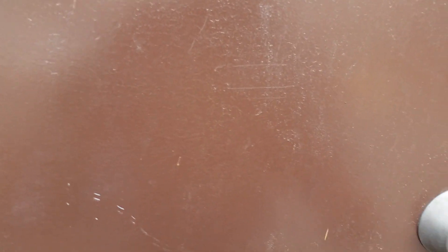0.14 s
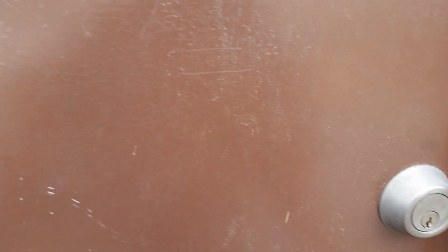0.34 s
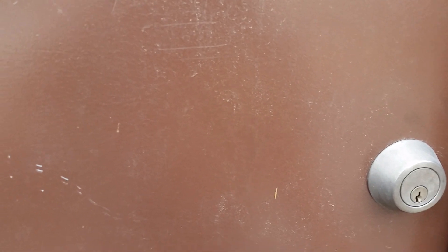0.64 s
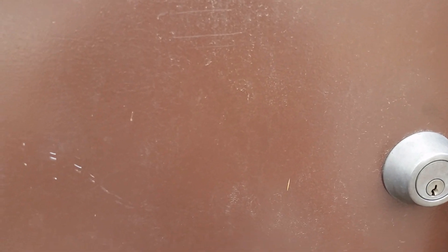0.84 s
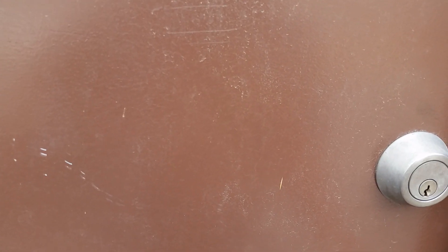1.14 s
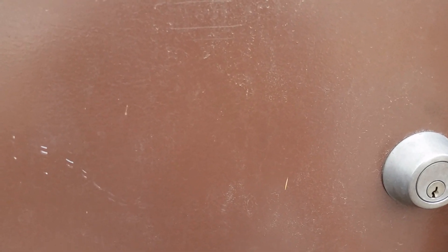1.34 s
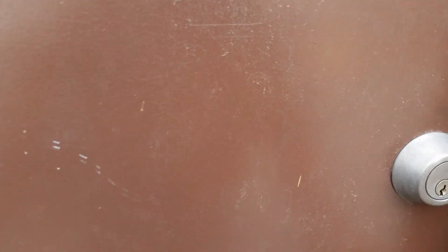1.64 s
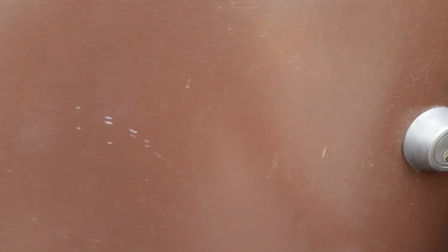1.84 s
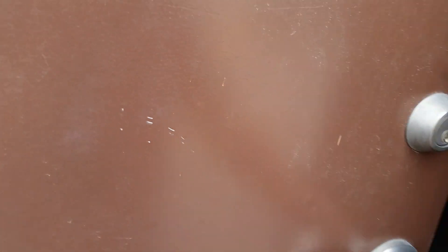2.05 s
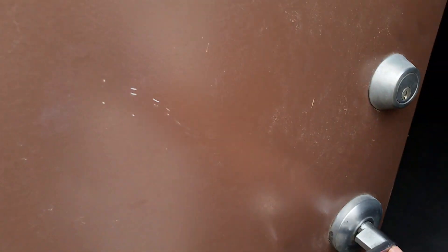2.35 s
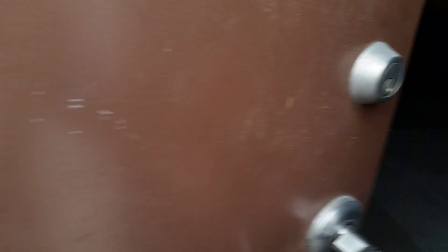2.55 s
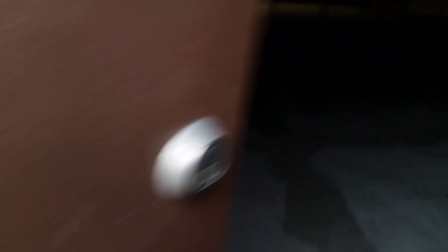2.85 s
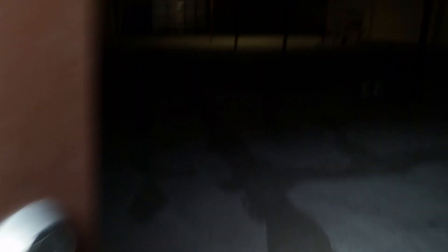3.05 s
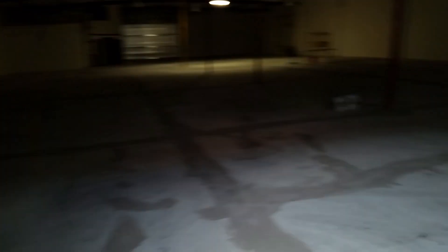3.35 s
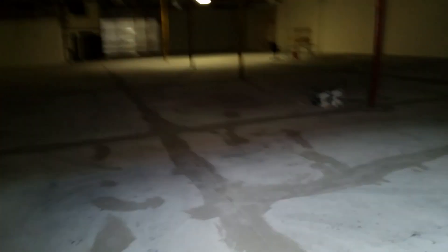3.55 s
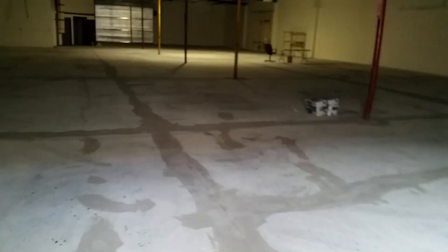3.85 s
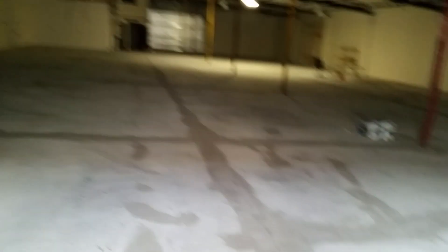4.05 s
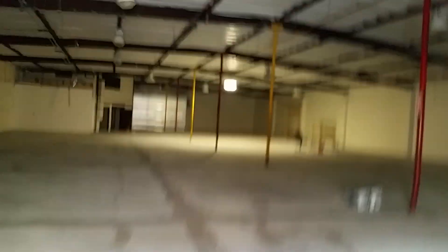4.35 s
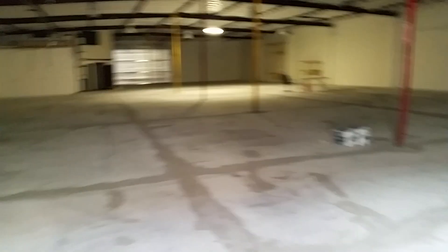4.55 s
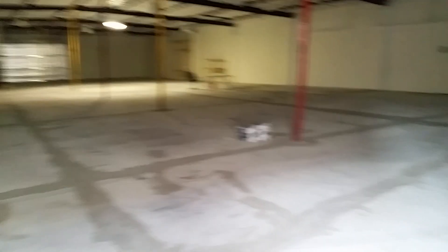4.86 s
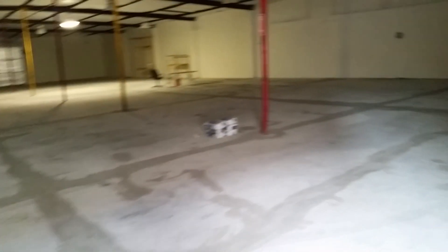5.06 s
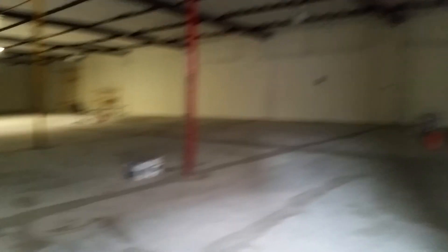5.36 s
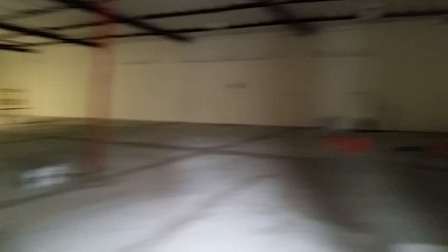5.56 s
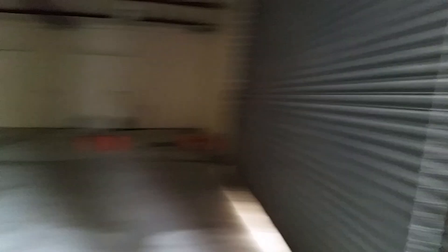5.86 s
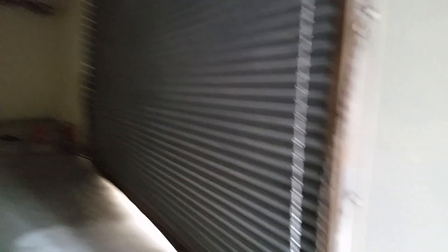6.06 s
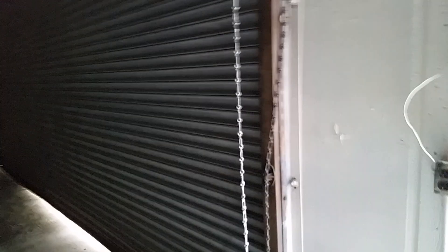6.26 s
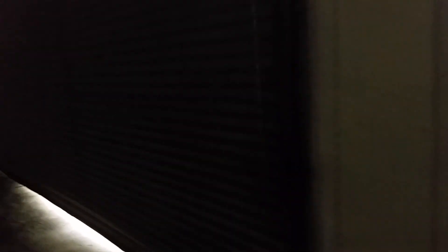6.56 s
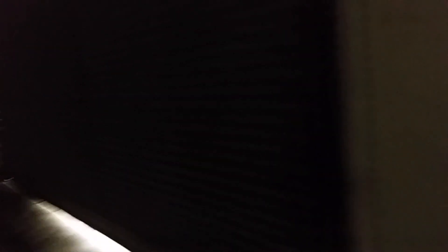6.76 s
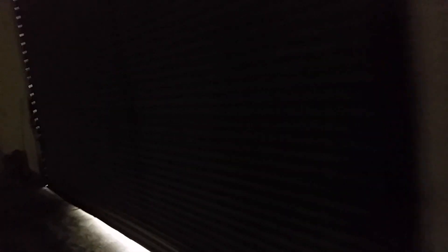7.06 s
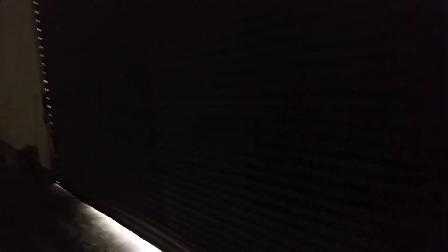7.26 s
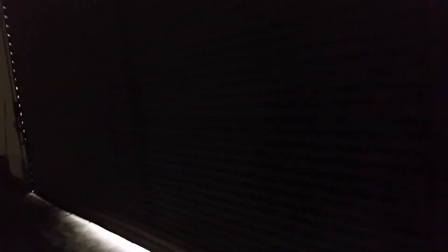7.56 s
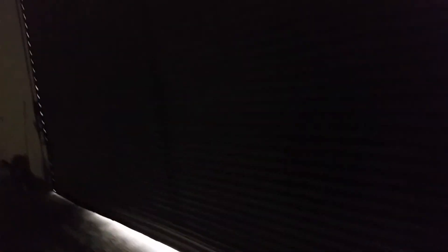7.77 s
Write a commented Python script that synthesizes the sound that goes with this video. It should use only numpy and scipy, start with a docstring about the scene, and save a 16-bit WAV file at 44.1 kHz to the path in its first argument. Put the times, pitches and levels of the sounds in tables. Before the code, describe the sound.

Loose keys clink over a heavy low hum, fumbling thumps and squeaks follow inside an empty hall, and a metal door latches shut, muffling the hum.

```python
"""An alley beside a steel door, then the empty hall behind it: a machine drones as wavering shaft orders over noise.
Keys jangle as noise clinks with ringing modes; the hand slips on the microphone case as air pulses and rasps.
Bright swishes, keys scraping and cloth, are noise strokes; thin metal rings and squeaks are wavering tones.
The door shuts: latch clacks and frame knocks are bursts, the leaf booms in low modes, a noise tail is the hall."""
import sys
import numpy as np
from scipy import signal
from scipy.fft import rfft, irfft, next_fast_len
from scipy.io import wavfile
from scipy.ndimage import map_coordinates

SR = 44100
rng = np.random.default_rng(int(sys.argv[2]) if len(sys.argv) > 2 else 0)


def inscribe(sig):
    """Save sig as 16-bit PCM at rate SR to the path in sys.argv[1].

    A 1-D sig is mono; a 2-D sig holds one channel per row.
    Samples are clipped to [-1, 1] before scaling.
    """
    pcm = np.round(np.clip(np.atleast_2d(sig).T, -1, 1) * 32767)
    wavfile.write(sys.argv[1], SR, pcm.astype(np.int16))


N = 349713

# door contacts as it shuts and settles, levels relative: (time [s], clack [dB], knock [dB], boom [dB],
# hall [dB], leaf free to ring [s])
DOOR_CONTACTS = [(6.673, -8.5, -20.5, -34, -33, .03), (6.686, -13, -18, -30, -42, .025),
                 (6.692, -18, -22, -40, -46, .02), (6.705, -24, -30, -38, -46.5, 0.01),
                 (6.7349, -39, -25, -26.5, -38, 0.54), (6.738, -12, -15, -25.5, -28, .5),
                 (6.7425, -18, -15, -36, -40, .05), (6.756, -24, -19, -18, -35, 0.33),
                 (6.765, -27, -22, -40, -44, .05), (6.777, -30, -25, -40, -46, .05),
                 (6.99, -48, -32, -44, -41.5, .05)]
# lower part of a key contact: (frequency [Hz], density [dB/Hz])
DULL_SPECTRUM = [(2000, -32), (3500, -7.5), (5500, -2), (7000, -6), (9000, -19.5)]


def amp(db):
    """Gain of a level in dB."""
    return 10 ** (np.asarray(db) / 20)


def unit(x):
    """Scaled to rms 1."""
    return x / np.sqrt(np.mean(x ** 2) + 1e-20)


def along(points, hz):
    """(Hz, value) points interpolated on a log frequency axis."""
    f, v = np.transpose(points)
    return np.interp(np.log(hz + 1), np.log(f + 1), v)


def curves(rows):
    """One value per sample for each column after the time."""
    s, *cols = np.transpose(rows)
    return [np.interp(np.arange(N) / SR, s, c) for c in cols]


def wobble(rate_hz):
    """Smooth random curve, rate_hz knots a second."""
    at = np.arange(0, N + 32, 32)
    knots = rng.standard_normal(int(N * rate_hz / SR) + 4)
    smooth = map_coordinates(knots, [at * rate_hz / SR], mode="nearest")
    return np.interp(np.arange(N), at, smooth)


def filtered(x, response):
    """x times a response of frequency."""
    m = next_fast_len(x.shape[-1] + 8192)
    return irfft(rfft(x, m) * response(np.fft.rfftfreq(m, 1 / SR)), m)[..., :x.shape[-1]]


def coloured(x, spectrum):
    """x shaped by (Hz, dB) points, rms 1."""
    return unit(filtered(x, lambda hz: amp(along(spectrum, hz))))


def sides(db):
    """Left and right gains for a left-minus-right level."""
    return np.sqrt(2 / (1 + amp(np.array([-2 * db, 2 * db]))))


def ports(pair, spectrum):
    """Two noises coloured and blended to rms 1; the microphone ports are most alike in the bass."""
    # left-right likeness: (frequency [Hz], likeness [0-1])
    likeness = [(60, .993), (150, .99), (300, .9), (600, 0.78), (1200, .45), (3000, .3), (6000, .05),
                (14000, 0.031)]
    # port balance: (frequency [Hz], left minus right [dB])
    port_lean = [(60, 1.5), (110, 0.5), (200, 0.5), (380, 2), (700, 3.5), (1290, 7), (2380, 4.5),
                 (4400, -2.5), (8120, 13.5), (15000, -12)]
    m = next_fast_len(pair.shape[1])
    hz = np.fft.rfftfreq(m, 1 / SR)
    angle = np.arccos(np.clip(along(likeness, hz), -1, 1)) / 2
    mid, side = rfft(pair, m) * amp(along(spectrum, hz)) * [np.cos(angle), np.sin(angle)]
    blended = np.array([mid + side, mid - side]) * sides(along(port_lean, hz))
    return unit(irfft(blended, m)[:, :pair.shape[1]])


def rush(spectrum, grain_db=0.):
    """Steady stereo noise; grain makes it scratchy."""
    return ports(rng.standard_normal((2, N)) * amp(grain_db * wobble(90)), spectrum)


def strokes(table):
    """Level of rubbing strokes that swell to a peak and fade, linear in dB."""
    out, t = np.zeros(N), np.arange(N) / SR
    for s, db, rise_s, fall_s in table:
        near = slice(max(round((s - 3 * rise_s) * SR), 0), round((s + 3 * fall_s) * SR))
        out[near] += amp(db - 20 * np.maximum((s - t[near]) / rise_s, (t[near] - s) / fall_s))
    return out


def add(track, s, sound):
    """Mix a stereo sound in at s seconds."""
    part = track[:, round(s * SR):][:, :sound.shape[1]]
    part += sound[:, :part.shape[1]]


def machine():
    """Shaft orders waver one by one over rumble, roar, humming panels, whirr, air and hiss."""
    # shaft orders: (multiple of shaft speed, level over the drone [dB])
    shaft_orders = [(2, -17), (3, -15), (4, -3), (5, -4.5), (6, -7.5), (7, -14.5), (8, -2), (10, -21),
                    (12, -24), (13, -22.5)]
    # humming panels: (frequency [Hz], level over the roar [dB])
    panel_modes = [(308, -4.5), (353, -2.5)]
    # levels heard, one list door ajar, one door shut: (time [s], drone [dB], roar [dB], air [rel dB])
    machine_levels = [
        [(0.0, -17, -31.5, -41), (0.16, -20.5, -35, -43), (0.8, -22.5, -38, -45), (1.25, -16.5, -29, -40),
         (1.42, -14, -32, -38), (1.62, -14.5, -27.5, -36), (1.97, -16, -35.5, -40), (2.5, -16, -34.5, -41),
         (2.72, -17.5, -38.5, -44), (2.95, -19, -34, -47.5), (3.29, -19, -31, -47), (3.5, -25.5, -34, -53.5),
         (4.08, -27.5, -39, -55), (4.19, -36, -35, -53), (4.32, -30, -42, -61), (4.45, -33.5, -45.5, -62),
         (4.83, -31.5, -46.5, -67), (5.2, -34.5, -46.5, -68.5), (5.62, -25.5, -35, -56.5),
         (5.92, -23, -33.5, -50), (6.6, -27, -36.5, -55)],
        [(7.2, -43.5, -41.5, -64), (7.482, -39, -41.5, -57), (7.62, -38, -37.5, -58.5),
         (7.78, -32.5, -35, -53.5), (7.93, -30.5, -35, -53.5)],
    ]
    # noise spectra, each: (frequency [Hz], density [dB/Hz])
    rumble_spectrum = [(13, -50), (22, -23), (45, -16), (59, -5), (86, -1), (155, -6.5), (172, -15.5),
                       (199, -15.5), (260, -21), (340, -49), (570, -120)]
    roar_spectrum = [(100, -31), (170, -8), (177, -9.5), (231, -8), (279, -6.5), (356, -3.5), (430, -14.5),
                     (560, -46), (950, -120)]
    whirr_spectrum = [(250, -33.5), (430, -8.5), (455, -3.5), (611, -1), (774, -9), (1030, -13.5),
                      (1170, -17.5), (1300, -16), (1690, -45), (2860, -120)]
    air_spectrum = [(530, -8.5), (900, 3), (1220, -3.5), (1390, 2), (2120, 1), (3120, -6.5), (4370, -9),
                    (5900, -21), (7000, -27.5), (9100, -28.5), (15400, -120)]
    hiss_spectrum = [(3240, -27.5), (5500, -13), (5980, -19), (6260, -12), (6900, -7.5), (8620, -1),
                     (10000, -7.5), (11500, -2.5), (12200, -3), (12900, 0.5), (14300, -2), (14750, -6),
                     (15000, -8)]
    # level following the air: (rel level with air at -50 dB [dB], slope [dB per dB of air])
    whirr_law = (-42.3, .55)
    hiss_law = (-53.5, 1.12)
    # passing the doorway: (start [s], end [s])
    doorway_s = (2.6, 3.2)
    # relative levels in alley, hall, hall with door shut: (order 8 [dB], first panel [dB],
    # second panel [dB], rumble [dB], whirr and hiss [dB])
    places = [(0.1, -7, -2, 3.5, 1.5), (0.6, 4.5, 0.4, -1.5, 0.1), (7, 0.1, -4, 5, -3)]
    # microphone turning from the machine: (time [s], left behind right [ms], extra roar left minus right [dB])
    facing = [(0, .26, 0.1), (2.3, .26, -1), (2.7, -.25, -1), (3.3, -.35, 4), (3.6, -.42, 3),
              (4.6, -.33, 1), (5.0, -.2, -1), (5.3, -.1, -1), (5.6, .3, -1), (6.0, .2, -1),
              (6.25, -.08, -1), (6.6, .3, -1), (7.0, -.3, -1), (7.9, -.12, -1)]
    shaft_hz = 18.35

    ajar, shut = machine_levels
    shut_s = DOOR_CONTACTS[0][0]
    ducked_s = shut_s + .01  # the hum ducks at the first clack
    drone_db, roar_db, air_db = curves(
        [*ajar, (shut_s, *ajar[-1][1:]), (ducked_s, *shut[0][1:]), *shut])
    whirr_db, hiss_db = (db + slope * (air_db + 50) for db, slope in (whirr_law, hiss_law))
    alley, inside, closed = places
    top_db, *panel_db, rumble_db, boost_db = curves(
        [(doorway_s[0], *alley), (doorway_s[1], *inside), (shut_s, *inside), (ducked_s, *closed)])

    def tone(phase, waver):
        level = amp(waver * wobble(5))
        return level * np.sin(phase + 0.13 * waver * wobble(4) + rng.uniform(0, 2 * np.pi))

    turn = 2 * np.pi * np.cumsum(shaft_hz * (1 + 0.0011 * wobble(1.54))) / SR
    orders = sum(amp(db + top_db * (k == 8)) * tone(k * turn, 1.2 if k in (4, 8) else 2.2)
                 for k, db in shaft_orders)
    panels = sum(amp(db + share_db) * tone(2 * np.pi * hz * np.arange(N) / SR, 1.3)
                 for (hz, db), share_db in zip(panel_modes, panel_db))
    rumble = amp(rumble_db - 7.5) * rush(rumble_spectrum)
    drone = amp(drone_db) * (orders * sides(0.53)[:, None] + rumble)
    roar = amp(roar_db + .8 * wobble(4)) * (rush(roar_spectrum) + panels * sides(3.)[:, None])
    roar = roar + amp(whirr_db + boost_db + 2.5) * rush(whirr_spectrum)
    air = amp(air_db + 2.5) * rush(air_spectrum, 1.4)

    lag_ms, lean_db = curves(facing)
    late = np.arange(N) + np.array([[-.5], [.5]]) * lag_ms * SR / 1000
    mixed = drone + roar * sides(lean_db) + air
    low = np.array([map_coordinates(x, [at], mode="nearest") for x, at in zip(mixed, late)])
    return low + amp(hiss_db + boost_db + 2.5) * rush(hiss_spectrum, 1.3)


def keys():
    """Contacts clink; the struck piece rings freely, then damped, out of step at the two ports."""
    # modes of each piece, main one first: (frequency [Hz], level [dB], left minus right [dB],
    # share of the hand's lean, usual free ring [s])
    BIG = [(7850, -1.5, 16, .1, .014), (10930, -4, 8, .3, .011), (11140, -4, 9, .3, .011),
           (11300, -6, 12, .3, .009)]
    SMALL = [(14620, 0.1, -3, 1.4, .006), (9320, 0.1, -5, .4, .015)]
    FOB = [(10210, 0.1, 16, .3, .009), (10700, 0.1, 10, 1.1, .014), (9310, -6, 10, 1.1, .017)]
    TAG = [(5700, 0.1, 4, .1, .016), (4430, 0.1, 6, .1, .02)]
    # key contacts, levels relative: (time [s], clink [dB], piece that rings, ring [dB],
    # other modes over the main one [dB], free ring, where given [s])
    contacts = [(0.0997, -24, SMALL, -51, -10), (0.149, -13, SMALL, -38, -15), (0.3071, -28, BIG, -60, 16),
                (0.33, -16, BIG, -30, 11), (0.7416, -30, BIG, -55, 3), (1.013, -27.5, BIG, -55, 3),
                (1.0459, -18.5, SMALL, -41, -9), (1.076, -27, BIG, -55, 3), (1.2081, -18.5, BIG, -45, 16),
                (1.21, -60, TAG, -44, -15), (1.236, -19, TAG, -40, -15), (1.252, -40, TAG, -44, -15, .008),
                (1.3038, -23, BIG, -25, -15, .008), (1.3318, -27, BIG, -20, -5),
                (1.333, -60, TAG, -41, -15, .008), (1.3946, -25, BIG, -50, 3),
                (1.471, -31, BIG, -22, -12, .016), (1.475, -60, TAG, -37, -4, .01),
                (1.492, -45, BIG, -24, -12, .018), (1.5008, -21, BIG, -34, 11),
                (1.502, -60, TAG, -43, -3, .008), (1.5406, -32, BIG, -48, 19, .03),
                (1.7498, -20.5, FOB, -21, -22), (1.7862, -35, BIG, -26, 4), (1.843, -19, BIG, -29, -12),
                (1.8596, -28, BIG, -35, 18), (1.873, -40, BIG, -15.5, -22, .023),
                (1.8806, -26, BIG, -50, 3), (1.9, -23.5, BIG, -50, 3), (1.955, -15, BIG, -21, 1.5),
                (2.0207, -15, SMALL, -45, -5), (2.0486, -22, BIG, -25, -6, .03), (2.0644, -23, BIG, -27, 7),
                (2.1037, -16, BIG, -45, 23), (2.1174, -31, BIG, -26, -12), (2.2377, -22, BIG, -17, 1.5),
                (2.2628, -37, BIG, -45, 19), (2.53, -22, SMALL, -50, -5), (2.544, -21, SMALL, -50, -5),
                (2.5621, -24.5, SMALL, -50, -5), (2.5786, -9, BIG, -55, 18), (2.6603, -21.5, BIG, -50, 3),
                (2.7336, -21, BIG, -29, -12), (2.7461, -13.5, BIG, -15.5, -22),
                (2.7594, -23.5, BIG, -45, 3), (2.807, -16, BIG, -29, -11, .006),
                (2.823, -50, TAG, -37, -15, .012), (2.8324, -35.5, BIG, -55, 3),
                (2.858, -40, SMALL, -25, -18), (2.859, -8, BIG, -26, -4, .006),
                (2.86, -60, TAG, -31, -14, .008), (2.8714, -18.5, TAG, -48, -10, .02),
                (2.891, -45, BIG, -29, -15), (2.922, -50, TAG, -45, -15), (2.941, -22, BIG, -45, 3),
                (2.97, -20, BIG, -30, -12), (2.9814, -31, BIG, -19, -12, .02),
                (3.007, -40, BIG, -24, -12, .012), (3.0259, -17, BIG, -22, -18, .012),
                (3.0455, -21, FOB, -45, 21), (3.048, -60, BIG, -36, -15, .015),
                (3.05, -60, TAG, -55, -15, .03), (3.0564, -44, SMALL, -36, -15),
                (3.09, -50, FOB, -43, -9, .04), (3.2, -50, FOB, -52, 12, .03),
                (3.2205, -39, SMALL, -41, -12), (3.313, -20.5, SMALL, -55, -5),
                (3.5193, -28, FOB, -55, 15, .04), (3.528, -50, SMALL, -39, -18),
                (3.633, -41, SMALL, -35, -22), (3.6497, -28, SMALL, -8, -33, .055),
                (3.688, -36, SMALL, -60, -5), (3.7802, -32, SMALL, -35, -30), (3.8196, -32, SMALL, -38, -7),
                (3.852, -34.5, SMALL, -29, -22), (3.9847, -37, SMALL, -19, -45, .004),
                (4.012, -38, SMALL, -60, -5), (4.2262, -41, SMALL, -17.5, -40),
                (4.429, -42, SMALL, -60, -5), (4.4368, -42, SMALL, -60, -5),
                (4.4574, -20, SMALL, -14, -40, .004), (4.4595, -60, BIG, -47, 11),
                (4.462, -70, TAG, -60, -5), (4.4952, -43, SMALL, -60, -5), (4.5087, -41, SMALL, -60, -5),
                (4.6102, -33, BIG, -62, 28), (4.611, -70, TAG, -60, -5), (4.612, -60, SMALL, -48, -20, .02),
                (5.7118, -37, SMALL, -60, -5), (5.727, -28, SMALL, -50, -5), (5.8345, -31, SMALL, -27, -25),
                (7.176, -33, SMALL, -28, -30, .04)]
    # upper part of a contact: (frequency [Hz], density [dB/Hz])
    clink_spectrum = [(1500, -40), (4000, -28), (6200, -39), (8000, -18), (11000, 1), (13300, 6),
                      (14600, 0), (16500, -4)]
    # where the keys hang: (time [s], left minus right [dB], dull part of a contact [rel dB])
    hand_place = [(0, -13, -37), (1.1, -7, -39), (1.23, -4, -30), (1.39, -7, -36), (1.5, -8, -29),
                  (2.1, -5, -34), (2.6, -9, -46), (2.74, 2, -35), (2.88, 1, -31), (3.0, -1, -45),
                  (3.3, -16, -45), (3.65, -34, -45), (3.85, -15, -47), (4.0, -25, -58), (4.5, -22, -65),
                  (5.8, -21, -54), (7.2, -29, -52)]
    dull_per_clink = .3  # dB per dB
    gripped_s = 3.3  # from here the fist holds the keys

    out, t = np.zeros((2, N)), np.arange(SR) / SR
    burst_t = t[:2048]
    hand_lean, hand_dull = curves(hand_place)
    noise = rng.standard_normal((len(contacts), 2, 2, 2048))
    chance = rng.uniform(size=(len(contacts), 4, 5))
    times = np.array([row[0] for row in contacts] + [np.inf])
    highs, lows = coloured(noise[:, 0], clink_spectrum), coloured(noise[:, 1], DULL_SPECTRUM)
    for contact, high, low, draws in zip(contacts, highs, lows, chance):
        s, db, piece, ring_db, others_db, *given_free_s = contact
        lean_db = hand_lean[round(s * SR)]
        low_db = hand_dull[round(s * SR)] + dull_per_clink * db
        rattle_db = -9 if s < gripped_s else -24  # a loose bunch rattles on after the contact
        dying = amp(-60 * burst_t / 0.0082) + amp(rattle_db - 60 * burst_t / 0.091)
        clink = amp(db - 2.5) * high * dying * sides(lean_db)[:, None]
        add(out, s, clink + amp(low_db + 4) * low * dying)

        next_touch = times[times > s + .008].min() - s
        for k, (mode, mode_draws) in enumerate(zip(piece, draws)):
            hz, level_db, side_db, follows, usual_s = mode
            apart, split, beat, luck, grip = mode_draws
            peak_db = ring_db + level_db + (k > 0) * (others_db + 6 * (luck - .5))
            # a loose key shifts its pitch a little with the way it hangs
            hz = hz + 110 * (grip - .5) * (s < gripped_s)
            t60 = 0.24 * (14600 / hz) ** 1.47  # thin high modes lose their energy sooner
            u = t[:round(SR * (.07 + t60 / 3.5))]
            free_s = given_free_s[0] if given_free_s else min(usual_s * (.5 + beat), next_touch)
            # a touch takes most of the ring away; a faint, fluttering tail is left
            damped = amp(-60 * np.maximum(u - free_s, 0) / 0.032)
            flutter = .6 + .4 * np.sin(2 * np.pi * (17 * u + luck))
            touched = damped + 650 / hz * (1 - u / u[-1]) * flutter
            rise = 1 - np.exp(-u / (.0005 * (11000 / hz) ** 2))  # low modes build up more slowly
            phase = 2 * np.pi * hz * u + [[0], [np.pi * (1 + apart) / 2]]
            twin = .5 * np.sin(phase * (1 + .012 * (split - .5)) + 2 * np.pi * beat)  # close twin beats
            pair = np.sin(phase) + twin
            balance = sides(side_db + follows * lean_db)[:, None]
            add(out, s + .0005, amp(peak_db - 2.5 - 60 * u / t60) * touched * rise * pair * balance)
    return out


def hand():
    """Each slip pumps air at the port: quick push, slow rebound, rasp of the case; palm and swishes rub."""
    # finger slips on the left port: (time [s], level [dB], 1 press or -1 release, width [ms],
    # rasp over the level [dB])
    slips = [(2.783, -10.5, -1, 0.094, -8), (2.8171, -8.5, -1, 0.076, -2), (3.4786, -3, 1, 0.15, -12.5),
             (3.4924, 0.5, -1, 0.43, -36), (3.5035, -31, 1, .3, -30), (3.7089, -10, -1, 0.072, -1.5),
             (3.7177, -11, 1, 0.72, -40), (4.1124, -4, 1, 0.48, -44), (4.1176, -13, -1, 0.37, -17.5),
             (4.1323, -1.5, 1, 1, -44), (4.1478, -10, 1, 0.46, -20), (4.1642, -4.5, -1, 0.24, -22),
             (4.168, -21, -1, .2, -14), (4.1781, -6.5, -1, 0.23, -18), (4.1896, -18, -1, .2, -20),
             (4.197, -23, 1, .15, -14), (4.2029, -2, 1, 0.19, -18), (4.2042, -13, -1, .3, -20),
             (4.215, -20, -1, .3, -18), (4.2245, -22, -1, .4, -30), (4.2303, -18, 1, .4, -22),
             (4.2393, -9.5, 1, 0.17, -15), (4.2697, -17, 1, 0.17, -36)]
    # palm on the case: (peak time [s], level [dB], 20 dB rise [s], 20 dB fall [s])
    palm_strokes = [(3.26, -45, .05, .06), (3.304, -43.5, .1, .02), (3.46, -48, .25, .012),
                    (3.62, -56, .2, .012), (3.865, -42, .02, .15), (3.94, -41, .2, .025),
                    (4.16, -53, .04, .04), (4.2, -42, .03, .03), (4.215, -41, .03, .03),
                    (4.238, -43, .05, .012), (4.37, -52, .02, .1), (4.41, -52, .08, .06)]
    # bright swishes on the right, keys scraping and cloth: (peak time [s], relative level [dB],
    # 20 dB rise [s], 20 dB fall [s])
    swish_strokes = [(.154, -29.5, .1, .045), (1.238, -30, .1, .04), (3.6, -52, .03, .03),
                     (3.9, -43, .08, .07), (5.776, -44, .1, .6), (5.956, -40, .04, .25),
                     (6.432, -61, .2, .25), (7.456, -49, .045, .08)]
    # rubbing spectra, each: (frequency [Hz], density [dB/Hz])
    palm_spectrum = [(590, -25), (1000, 1), (1170, -8), (1840, 5), (2740, 2), (3180, -5), (5660, -15),
                     (6200, -17), (8420, -2), (15000, -8)]
    swish_spectrum = [(3820, -55), (6500, -42), (8330, -2), (9480, -15), (10700, -9), (11200, -8),
                      (12200, -6), (12900, 7), (15000, -9.5)]

    out, t = np.zeros((2, N)), np.arange(1024) / SR
    for (s, db, way, width_ms, rasp_db), r in zip(slips, rng.standard_normal((len(slips), 1024))):
        width_s = width_ms / 1000
        push = ((t / width_s) * np.exp(1 - t / width_s)) ** 3
        case_hz = 3700 * 2 ** np.clip(.15 * r[0], -.3, .1)  # the case rings differently under each grip
        rebound = 0.65 * np.sin(2 * np.pi * 170 * t) * amp(-60 * t / 0.019)
        rasp = (0.57 * r + np.sin(2 * np.pi * case_hz * t)) * amp(rasp_db - 60 * t / 0.0038)
        add(out, s, amp(db) * (np.sign(way) * (push - rebound) + rasp) * amp([[0], [-22]]))
    palm = strokes(palm_strokes) * rush(palm_spectrum, 3.0)
    swish = strokes(swish_strokes) * rush(swish_spectrum, 1.8) * sides(-9.0)[:, None]
    return out + palm + swish


def key_scrape():
    """Keys slide over one another: scratchy noise in strokes."""
    # strokes: (peak time [s], level [dB], 20 dB rise [s], 20 dB fall [s])
    scrape_strokes = [(1.24, -44, .08, .03), (1.485, -45, .02, .06), (2.83, -47, .02, .03),
                      (2.865, -42, .01, .12)]
    return strokes(scrape_strokes) * rush(DULL_SPECTRUM, 4.)


def thin_tones():
    """Thin wavering metal rings and squeaks: rough-edged tones that bend into pitch, nearer the left port."""
    # tones: (peak time [s], pitch [Hz], relative level [dB], 20 dB rise [s], 20 dB fall [s],
    # bend per rise time [Hz], noise share [0-1])
    tone_rows = [(2.903, 3460, -46, .03, .06, 40, .2), (2.95, 3470, -53, .02, .15, 20, .2),
                 (2.995, 4470, -48, .04, .1, -40, .2), (3.028, 4450, -47, .04, .05, 10, .2),
                 (3.055, 4480, -48, .02, .025, 30, .3), (3.11, 3470, -51, .03, .25, 10, .15),
                 (3.268, 2230, -46, .02, .03, -60, .4), (3.26, 3465, -51, .03, .3, 10, .15),
                 (3.39, 3470, -55, .1, .12, 10, .15), (3.382, 1700, -40, .006, .008, 100, .5),
                 (3.752, 660, -34, .06, .04, 250, .5), (3.943, 2720, -42, .015, .02, 120, .5),
                 (4.41, 3410, -39.5, .03, .03, 150, .25), (4.5, 3410, -62, .15, .25, 10, .4),
                 (4.475, 4470, -62, .01, .3, 10, .2), (4.545, 4470, -65, .1, .04, 10, .2),
                 (4.625, 3400, -65, .05, .03, 10, .5), (4.665, 3410, -55, .015, .04, 30, .25),
                 (4.73, 3410, -66, .15, .25, 10, .4), (4.85, 3415, -68, .15, .2, 10, .4)]
    out, t = np.zeros(N), np.arange(N) / SR
    drift, flutter, grit = wobble(45), amp(2.4 * wobble(40)), wobble(350)
    for s, hz, db, rise_s, fall_s, bend_hz, share in tone_rows:
        near = slice(round((s - 2 * rise_s) * SR), round((s + 2 * fall_s) * SR))
        bend = bend_hz * np.clip((s - t[near]) / rise_s, 0, 2)
        pitch_hz = hz * (1 + .004 * drift[near]) - bend
        level = amp(db - 20 * np.maximum((s - t[near]) / rise_s, (t[near] - s) / fall_s))
        rough = 1 - share + share * grit[near]
        out[near] += level * flutter[near] * rough * np.sin(2 * np.pi * np.cumsum(pitch_hz) / SR)
    return out * sides(8.)[:, None]


def hall(t60s, seconds):
    """Fresh stereo noise tail, left energy 1, each frequency dying at its own speed."""
    hz, t, z = signal.stft(rng.standard_normal((2, round(seconds * SR))), SR, nperseg=256)
    tail = signal.istft(z * amp(-60 * t / along(t60s, hz)[:, None]), SR, nperseg=256)[1]
    return tail / np.linalg.norm(tail[0])


def door():
    """The latch clacks, the frame knocks and rings, the leaf booms in low modes, the hall carries it on."""
    # burst and hall spectra, each: (frequency [Hz], density [dB/Hz])
    clack_spectrum = [(1760, -41), (3000, -3), (4520, -3), (6250, -26), (7910, -1), (10500, -5),
                      (13900, 11), (15000, 15)]
    knock_spectrum = [(150, -31), (250, 2), (700, -9), (1170, -12), (2190, -7), (2840, -23), (3840, -25),
                      (5000, -53), (6500, -73), (11000, -120)]
    # first contact of steel on steel
    crack_spectrum = [(500, -30), (1300, -3), (2200, 1.5), (3500, -10), (5000, -22), (9000, -30)]
    echo_spectrum = [(45, -12), (65, -3), (95, -4), (130, 3), (180, 0.5), (364, -12.5), (409, -19),
                     (601, -21.5), (802, -31), (1230, -25), (1490, -31.5), (2140, -32), (4370, -40),
                     (6550, -37), (13100, -29), (15000, -46)]
    # hall decay: (frequency [Hz], t60 [s])
    hall_t60 = [(300, 0.96), (1000, 1.6), (4000, 1.12), (14000, 0.62)]
    # steel leaf modes: (frequency [Hz], mean level [dB], t60 [s])
    leaf_modes = [(55.2, 0.5, 1.1), (67.1, 7, 0.9), (85, -4, 0.72), (122, 1.5, 0.6), (172, -7, 0.31),
                  (213, -14, 0.15), (292, -13, 0.43), (334, -12, 0.44), (472, -16, .2)]
    # steel frame modes: (mean frequency [Hz], mean level [dB], t60 [s])
    frame_modes = [(598, 5, .05), (1370, -3, .025), (1520, -6, .02), (2190, -2, .022), (2680, -8, .02),
                   (3810, -14, .02), (4270, -13, .02)]

    out, t = np.zeros((2, N)), np.arange(SR) / SR
    burst_t = t[:4096]

    def burst(spectrum, t60):
        noise = coloured(rng.standard_normal((2, 4096)), spectrum)
        return noise * amp(-60 * burst_t / t60) * (1 - np.exp(-burst_t / .0008))

    def frame_mode(hz, level_db, t60):
        level = amp(level_db + rng.normal(0, 3) - 60 * burst_t / t60)
        phase = 2 * np.pi * hz * rng.normal(1, .04) * burst_t
        return level * np.sin(phase + rng.normal(0, .5, (2, 1)))

    def leaf_mode(hz, level_db, t60):
        level = amp(level_db + rng.normal(0, 0.8) - 60 * t / t60)
        return level * np.sin(2 * np.pi * hz * t + rng.normal(0, 0.3))

    for s, clack_db, knock_db, boom_db, hall_db, free_s in DOOR_CONTACTS:
        clack = amp(clack_db) * burst(clack_spectrum, 0.16) * sides(1.0)[:, None]
        knock = burst(knock_spectrum, 0.04) + amp(2.5) * burst(crack_spectrum, 0.014)
        add(out, s, clack + amp(knock_db) * knock)
        frame = sum(frame_mode(*mode) for mode in frame_modes)
        add(out, s, amp(knock_db - 15) * frame * (1 - np.exp(-burst_t / .0012)))
        add(out, s + .008, amp(hall_db + 0.3) * ports(hall(hall_t60, 1.1), echo_spectrum))
        boom = sum(leaf_mode(*mode) for mode in leaf_modes)
        stopped = amp(-60 * np.maximum(t - free_s, 0) / 0.026)
        add(out, s, amp(boom_db) * boom * stopped * (1 - np.exp(-t / 0.0017)) * sides(.7)[:, None])
    return out


def scene():
    """Everything as it reaches the two ports."""
    return machine() + keys() + hand() + key_scrape() + thin_tones() + door()


def record(dry):
    """The treble stops steeply near 14.8 kHz, the highest peaks are rounded off, then the band is limited."""
    # treble edge: (frequency [Hz], gain [dB])
    treble_edge = [(100, 0), (14760, 0), (15000, -26), (16100, -36)]
    top_hz = 16085
    heard = filtered(dry, lambda hz: amp(along(treble_edge, hz)))
    soft = heard / (1 + np.abs(heard / .92) ** 6) ** (1 / 6)
    return filtered(soft, lambda hz: hz < top_hz)


dry = scene()
out = record(dry)
inscribe(out)
```